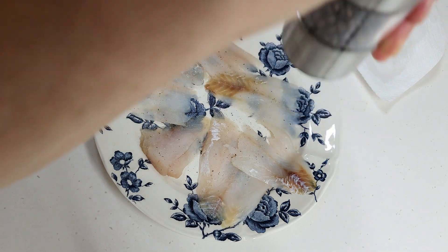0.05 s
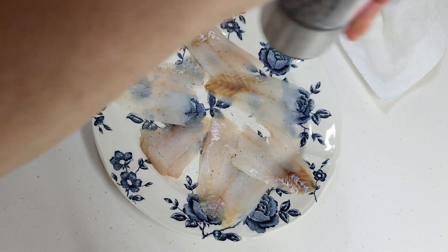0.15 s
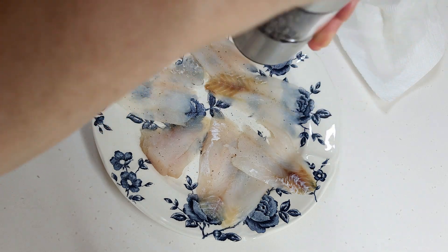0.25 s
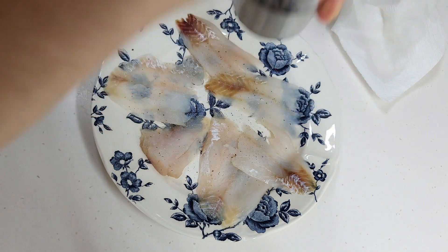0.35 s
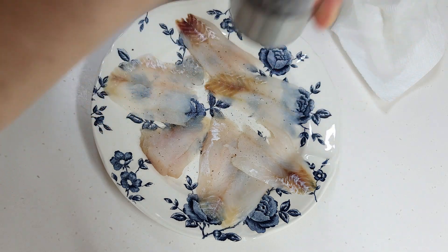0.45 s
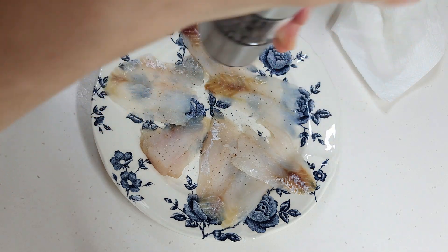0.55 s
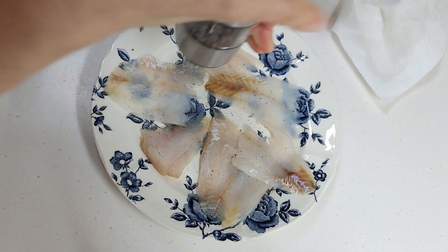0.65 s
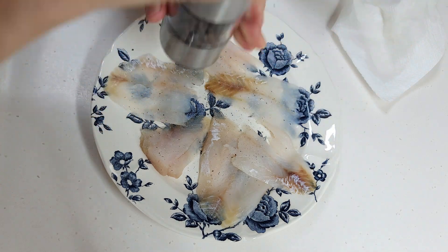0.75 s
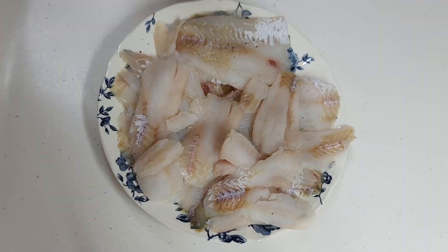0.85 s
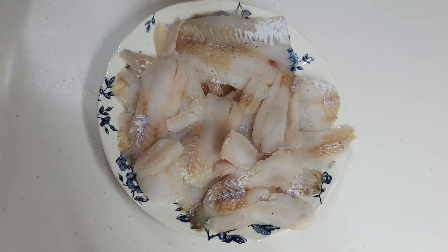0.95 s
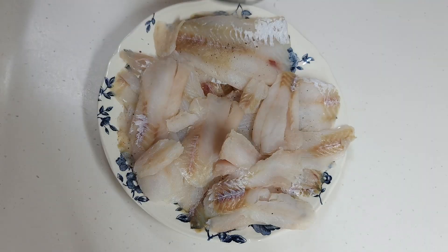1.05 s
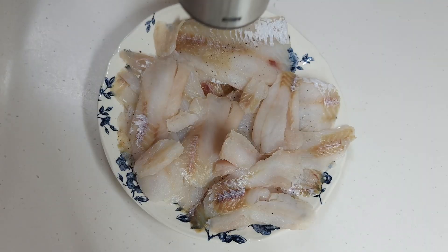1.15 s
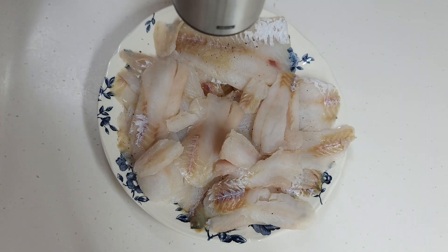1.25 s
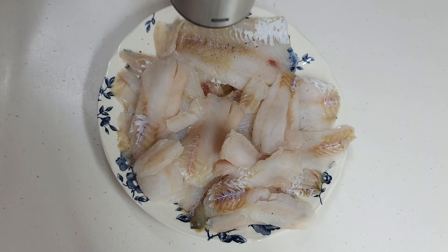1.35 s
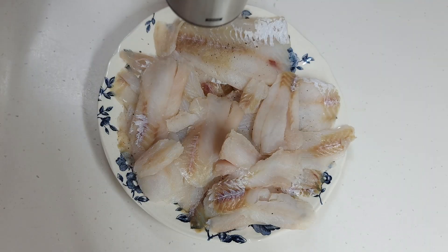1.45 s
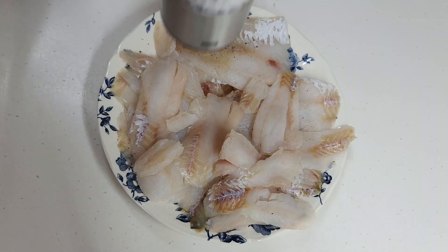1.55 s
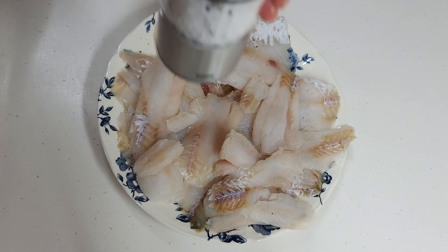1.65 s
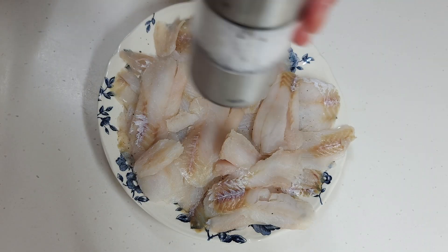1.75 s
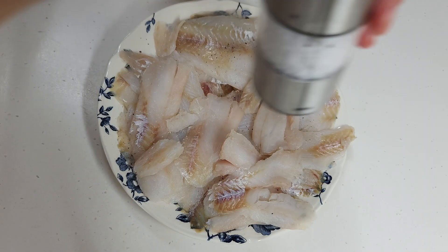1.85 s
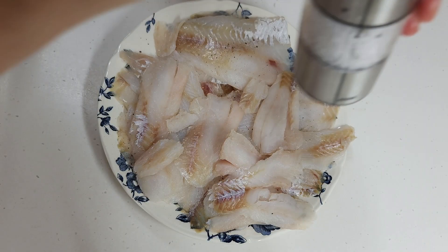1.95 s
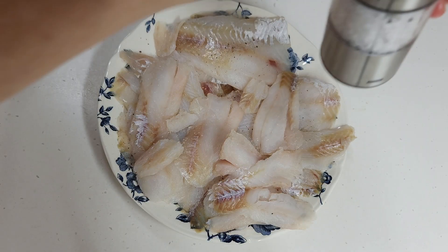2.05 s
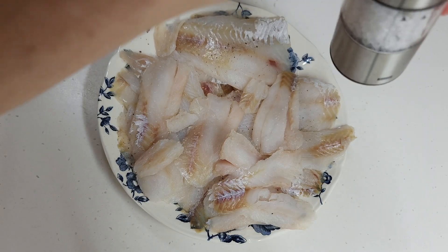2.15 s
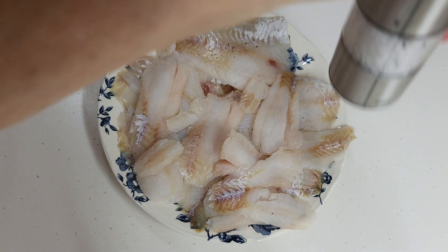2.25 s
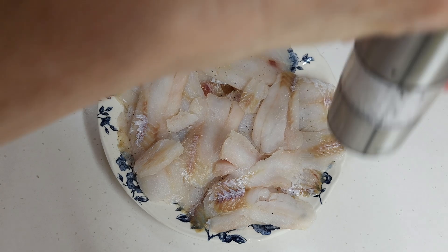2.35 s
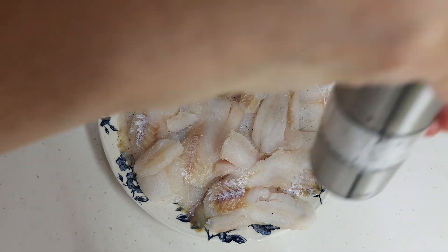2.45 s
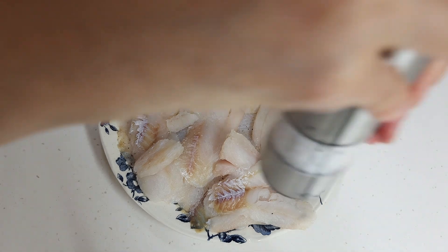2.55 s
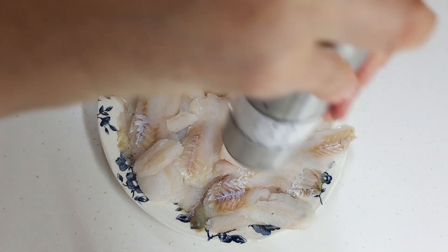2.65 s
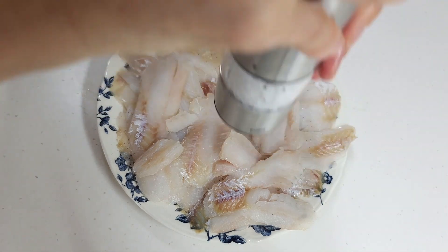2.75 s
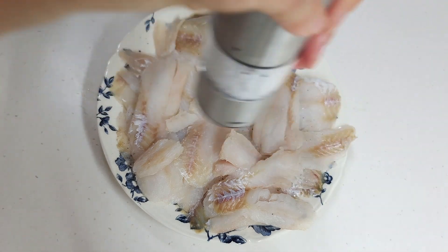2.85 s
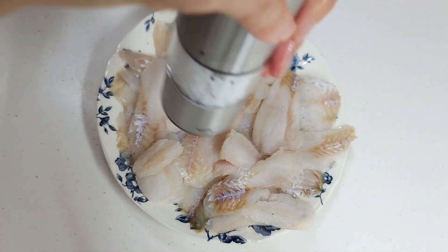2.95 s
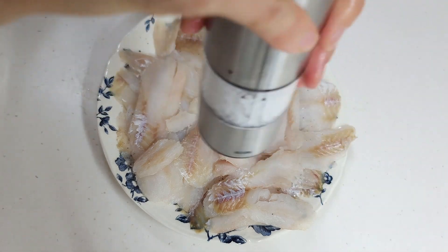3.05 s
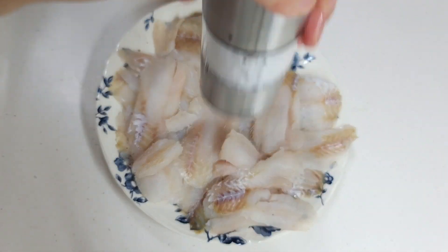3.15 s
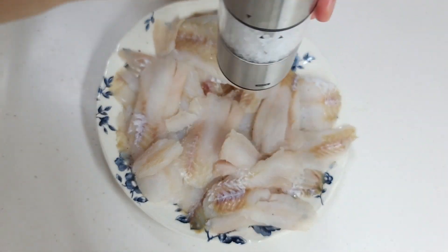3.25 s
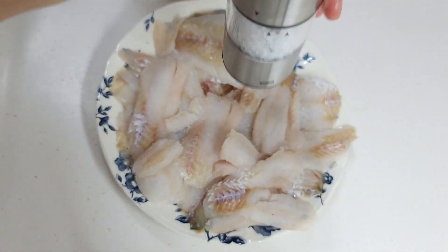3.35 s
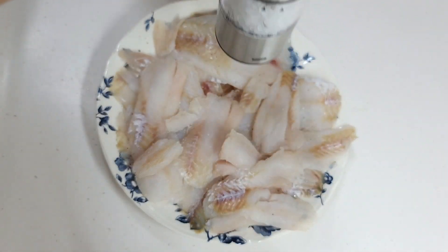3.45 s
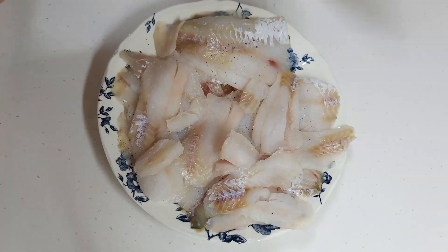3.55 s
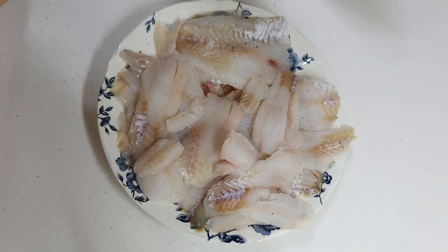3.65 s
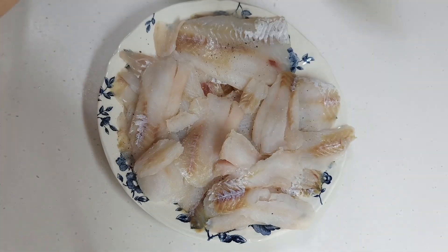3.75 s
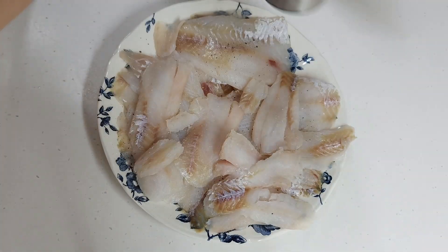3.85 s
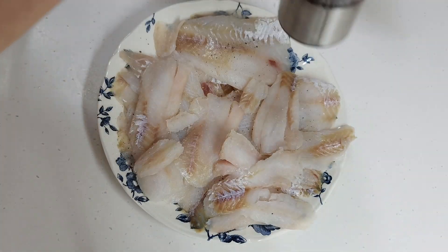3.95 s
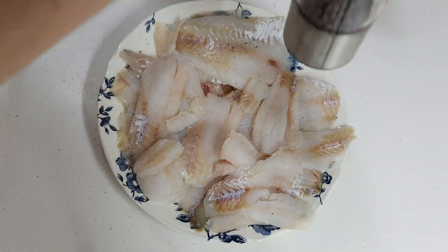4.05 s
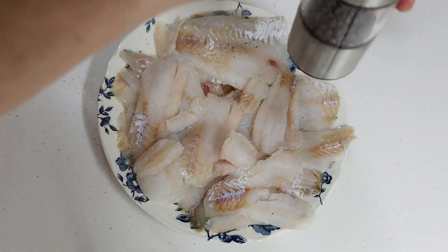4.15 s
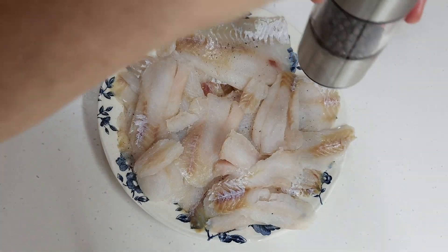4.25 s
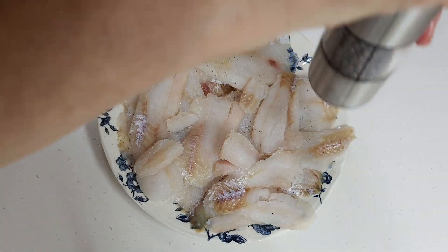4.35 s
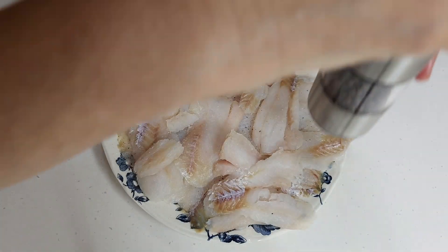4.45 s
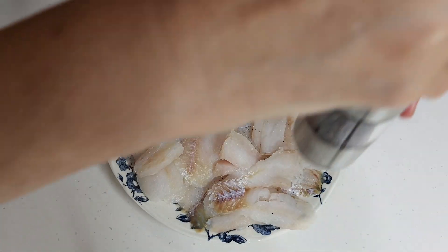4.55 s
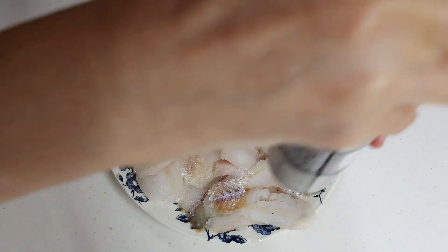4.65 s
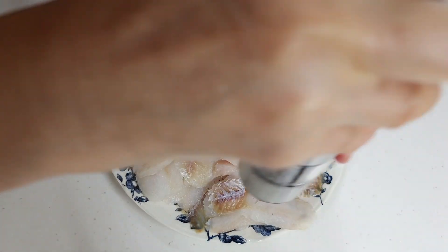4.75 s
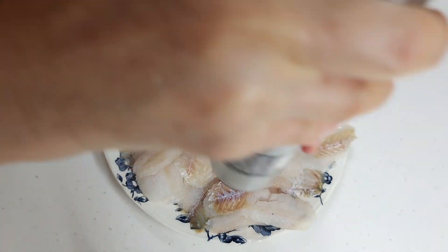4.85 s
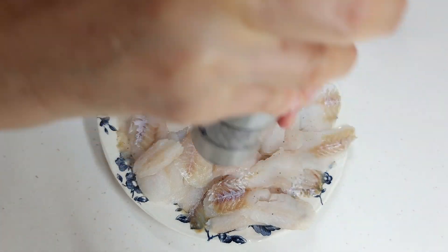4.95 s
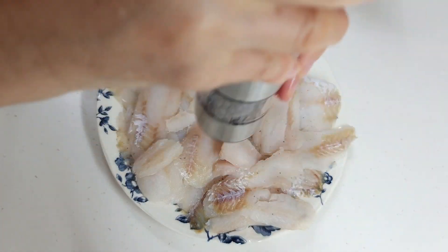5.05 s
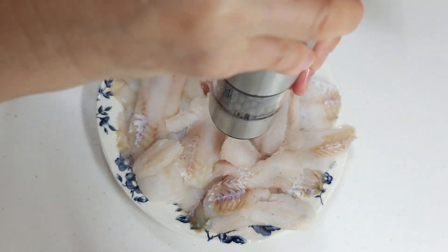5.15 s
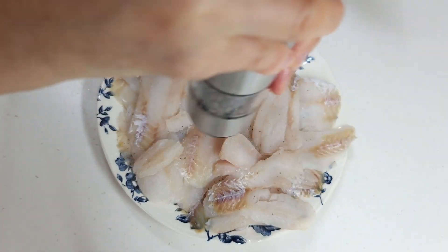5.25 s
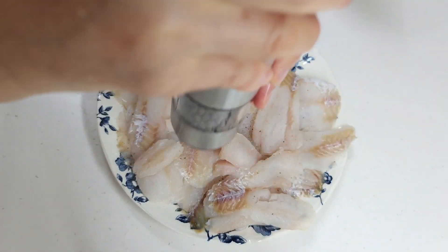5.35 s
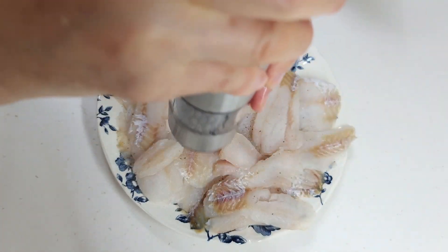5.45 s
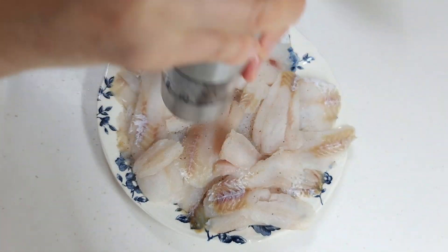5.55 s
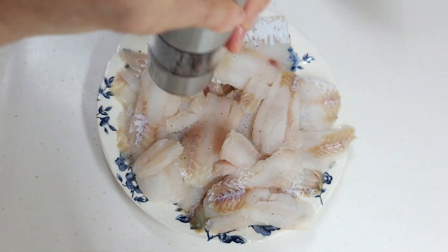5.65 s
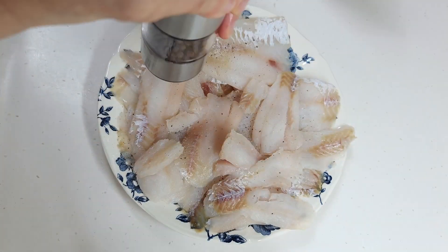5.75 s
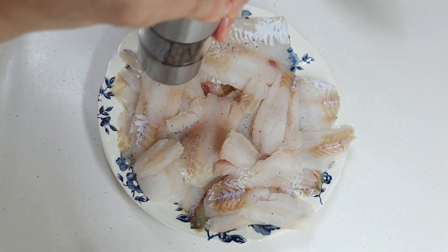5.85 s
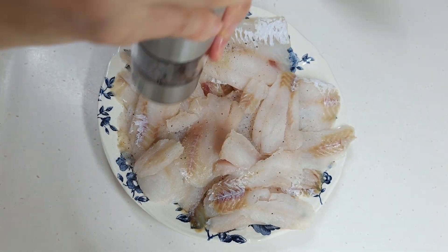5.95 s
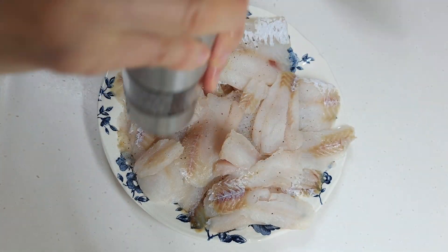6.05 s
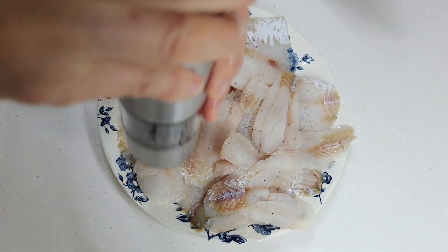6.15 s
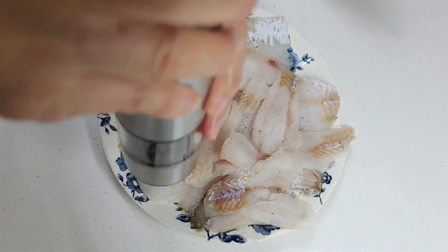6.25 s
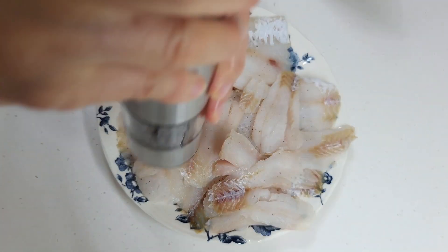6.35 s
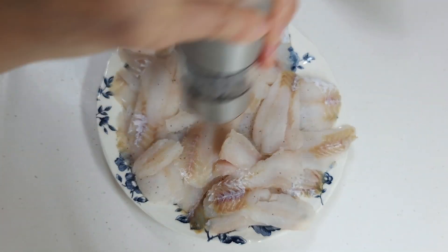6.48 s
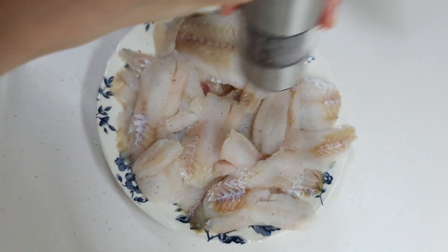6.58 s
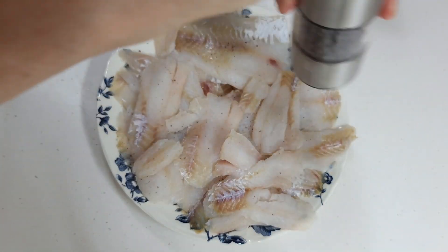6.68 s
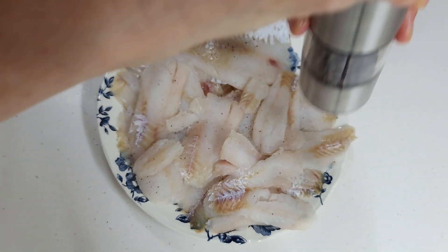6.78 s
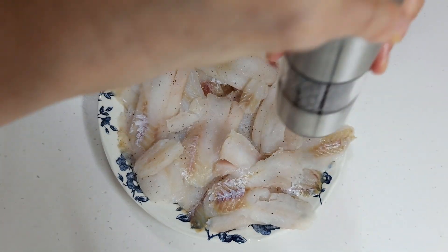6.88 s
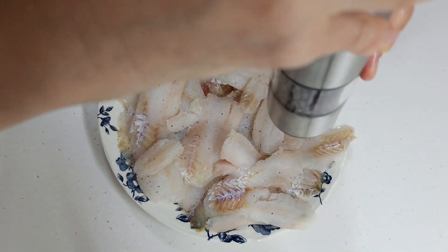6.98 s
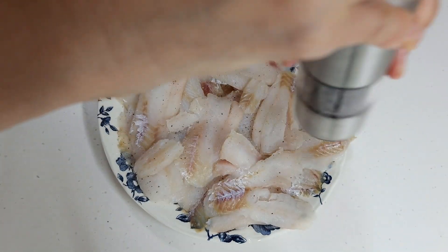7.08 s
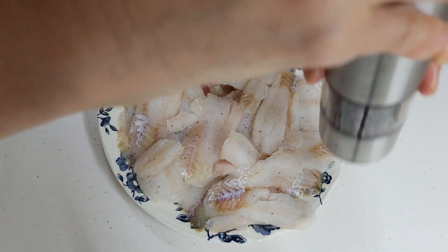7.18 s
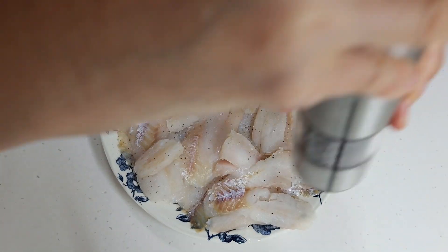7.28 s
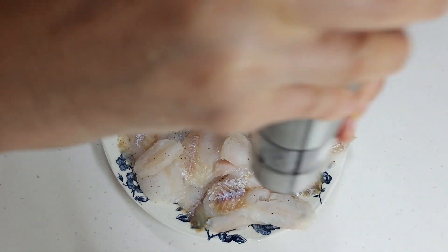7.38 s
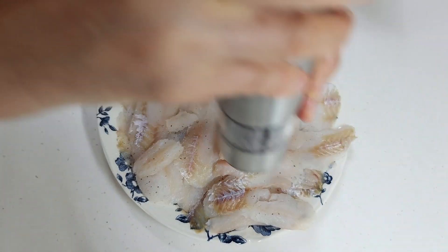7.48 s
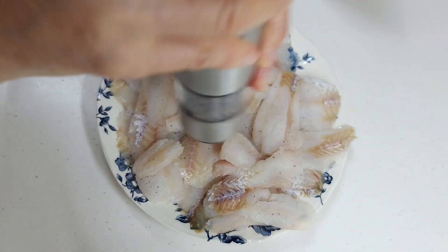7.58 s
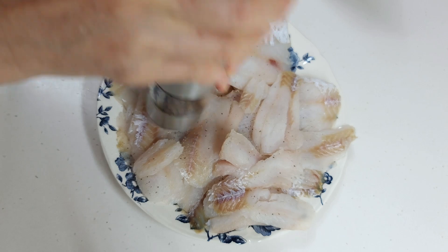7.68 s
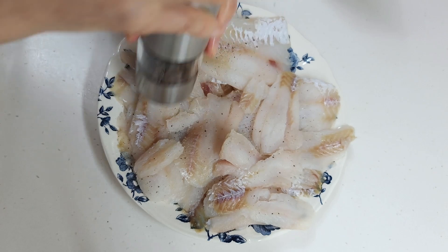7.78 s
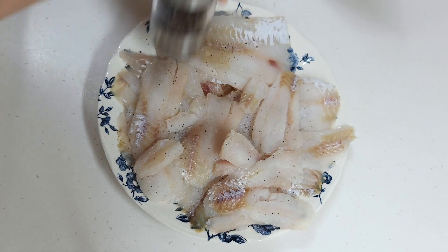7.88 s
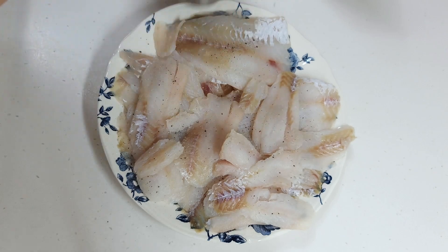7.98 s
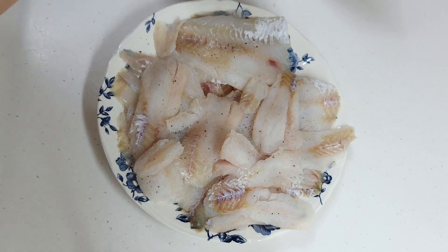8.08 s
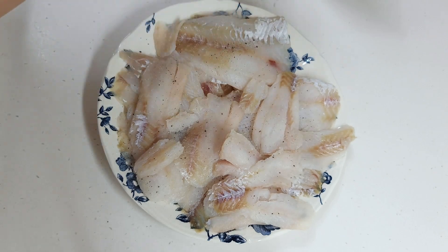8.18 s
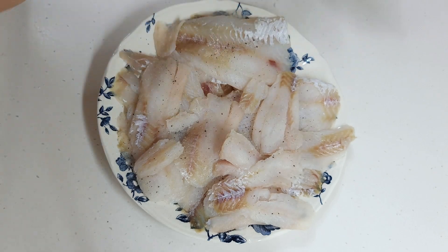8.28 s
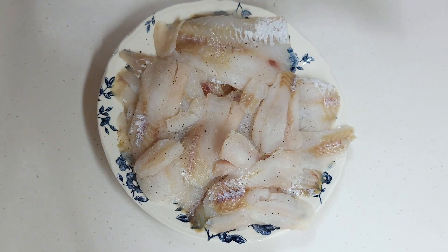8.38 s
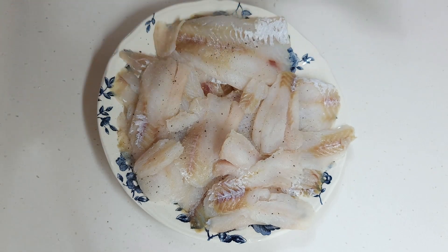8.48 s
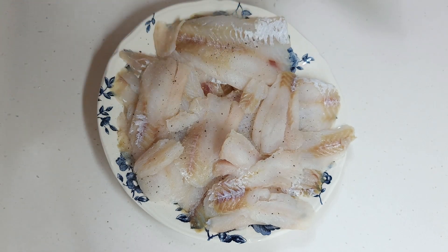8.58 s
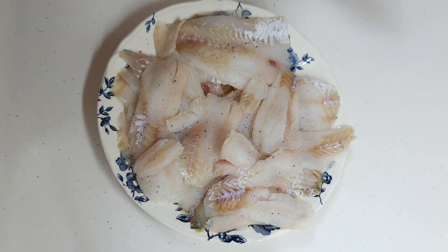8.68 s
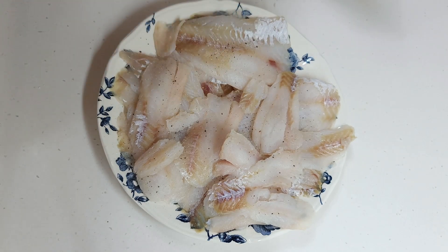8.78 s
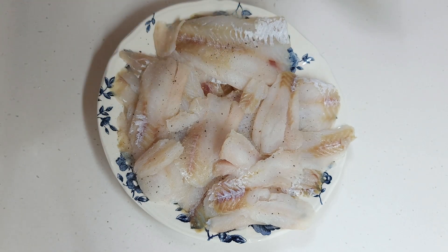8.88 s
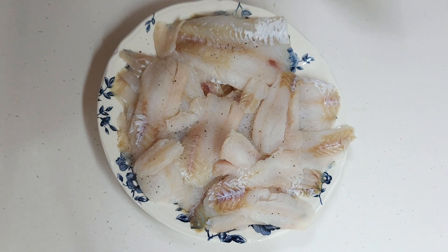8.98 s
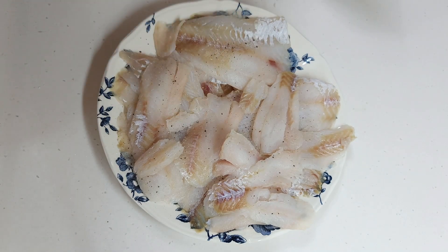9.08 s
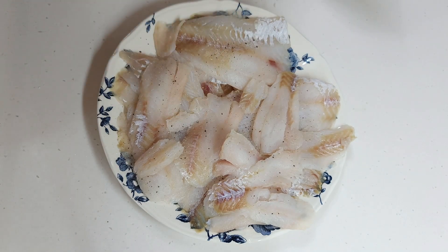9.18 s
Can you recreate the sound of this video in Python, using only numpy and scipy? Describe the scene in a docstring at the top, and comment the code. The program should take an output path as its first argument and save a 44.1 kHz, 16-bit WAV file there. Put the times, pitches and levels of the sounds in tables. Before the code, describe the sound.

Small electric grinder motors whir and whine in four spells, one crunching hard salt, then dull thuds bump the microphone stand in a quiet kitchen.

```python
"""A kitchen table, where two electric grinders season fish in four spells: pepper, salt, pepper, pepper.
Each motor drives a whining gear train that rattles in its housing and sags whenever a grain jams.
Salt crunches more, and hard grains crack: filtered noise bursts, as are the light clicks of handling.
At the end bumps on the microphone stand thud as decaying sines; low room rumble lies beneath."""
import sys
import numpy as np
from scipy import signal
from scipy.fft import rfft, irfft
from scipy.io import wavfile
from scipy.ndimage import map_coordinates

SR = 44100
rng = np.random.default_rng(int(sys.argv[2]) if len(sys.argv) > 2 else 0)


def wav_record(signal):
    """Record a signal, one row per channel, as 16-bit PCM in the file named by sys.argv[1]."""
    frames = np.transpose(np.atleast_2d(signal))
    bounded = np.clip(frames, -1, 1)
    # unit amplitude maps onto the largest positive 16-bit level
    quanta = np.round(bounded * 32767).astype(np.int16)
    wavfile.write(sys.argv[1], SR, quanta)


N = 406865
TIME = np.arange(N) / SR
TEETH = 11  # mesh cycles per turn of the shaft

# resonances of the salt grinder's housing: (frequency [Hz], width [Hz], lift [dB])
SALT_HOUSING = [(2053, 220, 7.8), (3115, 810, 9.5), (5180, 580, 10.5), (6150, 1000, 16.3), (8000, 370, 1)]


def amp(db):
    """Decibels to gain."""
    return 10 ** (np.asarray(db) / 20)


def unit(x):
    """Scales to rms 1."""
    return x / np.sqrt(np.mean(x ** 2) + 1e-20)


def read(points, hz):
    """Reads a table on a log-frequency axis."""
    f, value = np.transpose(points)
    return np.interp(np.log(hz + 1), np.log(f + 1), value)


def add(mix, s, sound):
    """Mixes a sound in at s seconds."""
    part = mix[..., max(round(s * SR), 0):][..., :sound.shape[-1]]
    part += sound[..., :part.shape[-1]]


def blend(a, b, share):
    """Mixes two signals so that b has the given share of the power."""
    share = np.clip(share, 0, 1)
    return np.sqrt(1 - share) * unit(a) + np.sqrt(share) * unit(b)


def wander(n, hz):
    """Slow chance of rms 1, with rates up to about hz."""
    rates = np.fft.rfftfreq(n, 1 / SR)
    return unit(irfft(rfft(rng.standard_normal(n)) / (1 + (rates / hz) ** 4), n))


def lifted(resonances, hz):
    """The dB that resonances add at a frequency."""
    return sum(lift / (1 + (2 * (hz - f) / width) ** 2) for f, width, lift in resonances)


def above(value, knee, steepness):
    """A gain that is 1 well above the knee and falls away below it."""
    return 1 / (1 + (knee / (value + 1)) ** steepness)


def body(x, colour, resonances=(), size=4096):
    """Rings x through a causal filter: a smooth spectrum lifted by resonances."""
    hz = abs(np.fft.fftfreq(size, 1 / SR))
    log_gain = np.log(amp(read(colour, hz) + lifted(resonances, hz)))
    # minimum phase: the ring starts at once and only decays
    ring = np.fft.ifft(np.exp(np.conj(signal.hilbert(log_gain)))).real[:size // 2]
    return signal.oaconvolve(x, ring)[:len(x)]


def band(x, lo_hz, hi_hz):
    """The part of x between two frequencies."""
    hz = np.fft.rfftfreq(len(x), 1 / SR)
    return irfft(rfft(x) * ((hz > lo_hz) & (hz < hi_hz)), len(x))


def burst(t60, colour, resonances=(), size=4096):
    """A short crackle of peak 1 that builds in a moment and dies away."""
    t = np.arange(size) / SR
    x = body(rng.standard_normal(size) * amp(-60 * t / t60), colour, resonances)
    x *= 1 - np.exp(-t / .002)
    return x / abs(x).max()


def pepper_grinder():
    """Tones and rattle of the pepper spells: softer grains, so the mill mostly whirs."""
    # presses of the button: (on [s], off [s], coasting time [s], free speed [turns/s], whine [relative dB],
    # rattle [relative dB], treble [dB re rattle], squeal [dB re rattle])
    spells = [(-0.4, 0.392, 0.18, 187.5, -29.5, -26.5, -13, -24.5),
              (3.872, 6.497, 0.29, 196.5, -33, -30.5, -10.5, -15.5),
              (6.869, 7.505, 0.278, 192.3, -32.5, -30, -12.5, -20)]
    # gear mesh and its side tone: (order [cycles/turn], level [dB re whine])
    mesh = [(11, 0), (12, -5.5)]
    # overtones of the mesh, a thin squeal: (order [cycles/turn], level [dB re squeal])
    high_mesh = [(22, 0), (23, -0.5), (24, -8), (33, -4), (34, -8)]
    # other orders of the motor: (order [cycles/turn], level [relative dB])
    orders = [(3, -31), (4, -25), (5, -30), (8, -18), (9, -20), (10, -24), (14, -24), (15, -23), (16, -22),
              (18, -21)]
    # spectrum of the rattle: (frequency [Hz], level [relative dB])
    colour = [(100, -11.5), (450, -31.5), (800, -16), (1150, -10), (1600, -3.5), (2600, -3), (3300, 0),
              (3900, -5.5), (5000, -4.5), (5600, -6), (6500, -9), (7300, -13.5), (11500, -18), (15500, -23)]
    # resonances of the housing: (frequency [Hz], width [Hz], lift [dB])
    housing = [(1455, 110, 7.5), (2050, 560, 6.9), (4356, 400, 8.7), (6070, 330, 4.6), (9130, 710, 3.9),
               (10420, 370, 5.1)]
    # panel resonances that the squeal sweeps through: (frequency [Hz], width [Hz], lift [dB])
    panel = [(4203, 410, 9.5), (6040, 300, 9)]
    out = np.zeros((2, N))
    for spell in spells:
        add(out, *grinder(spell, mesh, high_mesh, orders, colour, housing, panel,
                          repeat_share=0.27, grain_share=0.49, flutter_db=1.0, swell_db=0.53,
                          clatter_db=6.5, hum_db=-0.5, octave_db=-2, treble_follow=-0.38))
    return out


def salt_grinder():
    """Tones and rattle of the salt spell: hard grains take more of the power and crunch."""
    # presses of the button: (on [s], off [s], coasting time [s], free speed [turns/s], whine [relative dB],
    # rattle [relative dB], treble [dB re rattle], squeal [dB re rattle])
    spells = [(1.079, 3.06, 0.272, 192.1, -32.5, -20.5, -8, -17)]
    # gear mesh and its side tone: (order [cycles/turn], level [dB re whine])
    mesh = [(11, 0), (12, -14)]
    # overtones of the mesh, a thin squeal: (order [cycles/turn], level [dB re squeal])
    high_mesh = [(32, -8), (33, 0), (34, -8)]
    # other orders of the motor: (order [cycles/turn], level [relative dB])
    orders = [(1, -28), (3, -25), (4, -35), (5, -33), (8, -26), (9, -26), (10, -22), (16, -24)]
    # spectrum of the rattle: (frequency [Hz], level [relative dB])
    colour = [(100, -34.5), (400, -11), (750, -5.5), (1150, -2), (1500, 5.5), (2500, 2), (3800, 2.5),
              (4600, 5.5), (5800, -6.5), (7200, -0.5), (9500, -3), (12000, -1.5), (15500, -10)]
    # panel resonances that the squeal sweeps through: (frequency [Hz], width [Hz], lift [dB])
    panel = [(4950, 300, 15.4), (6240, 180, 10.6)]
    out = np.zeros((2, N))
    for spell in spells:
        add(out, *grinder(spell, mesh, high_mesh, orders, colour, SALT_HOUSING, panel,
                          repeat_share=0.2, grain_share=0.64, flutter_db=2.5, swell_db=0.45,
                          clatter_db=4.5, hum_db=-0.6, octave_db=-3.5, treble_follow=0.36))
    return out


def grinder(spell, mesh, high_mesh, orders, colour, housing, panel, repeat_share, grain_share,
            flutter_db, swell_db, clatter_db, hum_db, octave_db, treble_follow):
    """One spell: its start, then tones and rattle that share one shaft angle and fade as the shaft stops."""
    on, off, coast_s, free_speed, whine_db, rattle_db, treble_db, squeal_db = spell
    whine_low_hz, whine_steepness = 1370, 16  # below this pitch the housing radiates little whine
    rattle_low_speed, rattle_steepness = 74.4, 3.46  # turns/s below which the rattle dies away
    engage_s = 0.0083  # the slack in the gears is taken up before they rattle in full
    t = np.arange(max(on, 0), off + coast_s, 1 / SR)
    n = len(t)
    speed, whine_lift_db, rattle_lift_db, squeal_lift_db = motor(t, on, off, coast_s, free_speed)
    pace = speed / free_speed
    turns = np.cumsum(speed * (1 + 0.0012 * wander(n, 81))) / SR  # slight random jitter

    whine_gain = amp(whine_db + whine_lift_db) * above(TEETH * speed, whine_low_hz, whine_steepness)
    rattle_gain = amp(rattle_db + rattle_lift_db + swell_db * wander(n, 15))
    rattle_gain *= above(speed, rattle_low_speed, rattle_steepness)
    rattle_gain *= 1 - np.exp(-(t - on) / engage_s)
    treble_gain = amp(treble_db + treble_follow * rattle_lift_db)

    rattle = gear_rattle(turns, pace, treble_gain, colour, housing, repeat_share, grain_share,
                         flutter_db, clatter_db)
    whine, hum, squeal = shaft_tones(turns, speed, pace, squeal_db + squeal_lift_db, mesh, high_mesh,
                                     orders, panel, hum_db, octave_db)
    tones = whine_gain * whine + rattle_gain * (hum + squeal)
    return t[0], np.array([tones, amp(-1.5) * rattle_gain * rattle]) * signal.windows.tukey(n, .01)


def motor(t, on, off, coast_s, free_speed):
    """Spin-up, sags at jams and coasting: speed in turns/s, and the lifts of whine, rattle and squeal in dB."""
    # a grain jams in the burr, presses the teeth together and drags the motor down: (deepest sag [s],
    # half length [s], sag [turns/s], whine lift [dB], rattle lift [dB], squeal lift [dB])
    jams = [(0.208, 0.0374, 1.06, 6.5, 0, 2), (0.369, 0.059, 15.7, 3.5, 0, 0),
            (1.197, 0.041, 18.6, 11.5, 4.5, 7), (1.296, 0.064, 27, 10.5, 3.5, -4),
            (1.474, 0.039, 5, 10.5, 0, -7), (1.614, 0.026, 5.24, 10.5, 2, 2),
            (1.719, 0.031, 11.8, 12, 1.5, 16), (1.783, 0.024, 12, 12, 3, 13), (1.893, 0.05, 11, 11, 1.5, 1),
            (2.164, 0.043, 6.2, 6, -0.5, 5), (2.332, 0.058, 5.3, 8, 2, 1),
            (2.557, 0.038, 10.1, 15, 2.5, 11), (2.736, 0.04496, 10.3, 15, 1, 4),
            (2.839, 0.051, 7, 7, 1.5, -3), (3.046, 0.023, 2.7, 8, 3, 1), (4.201, 0.1, 20.3, 12.5, 2, 8),
            (4.458, 0.092, 18.1, 7, 3, 12.5), (4.611, 0.067, 17.1, 8, 2, 6.5),
            (5.076, 0.15, 7.04, -1, 0.5, 2), (5.418, 0.062, 13, 2, 3, 8), (5.717, 0.148, 14.3, 3.5, 2.5, 4),
            (5.951, 0.074, 5.95, -6, 1.5, 2), (6.13, 0.074, 10.8, 0, 2, 0), (6.319, 0.038, 5.65, 7, 3, -23),
            (7.02, 0.075, 13.6, 5.5, 4, 0), (7.091, 0.0279, 3.01, 8, 0.5, 0),
            (7.192, 0.03, 5.54, 11, 4.5, 6), (7.321, 0.066, 15.4, 13, 4.5, 2),
            (7.419, 0.026, 4.6, 13.5, 4.5, -5)]
    spin_up_s = 0.055  # time constant
    coast_curve = 1.2  # friction stops the motor almost linearly
    load_lead, load_length = 0.49, 0.89  # shares of the half length: load peaks before the sag, and is briefer
    coast_whine_db, release_s = 9, 0.086  # once the drive lets go, the mesh rings more freely

    at, half_s, sag, whine_lift_db, rattle_lift_db, squeal_lift_db = np.transpose(jams)
    through = (t[:, None] - at) / half_s
    drag = np.exp(-through ** 2)
    load = np.exp(-((through + load_lead) / load_length) ** 2)
    driven = free_speed * (1 - np.exp(-(t - on) / spin_up_s)) - drag @ sag
    coasting = np.clip(1 - (t - off) / coast_s, 0, 1) ** coast_curve
    speed = np.maximum(driven, 0) * coasting
    released = np.clip((t - off) / release_s, 0, 1)
    whine_lift = load @ whine_lift_db + coast_whine_db * released
    return speed, whine_lift, load @ rattle_lift_db, load @ squeal_lift_db


def shaft_tones(turns, speed, pace, squeal_db, mesh, high_mesh, orders, panel, hum_db, octave_db):
    """Whine, hum and squeal: partials locked to multiples of the shaft's turning."""
    n = len(turns)
    angle = 2 * np.pi * turns

    def line(order):
        """A partial of the shaft, wavering at random in phase and level."""
        phase = 2 * np.pi * rng.random() + .18 * wander(n, 40)
        return unit(np.cos(order * angle + phase) * amp(3.5 * wander(n, 25)))

    whine = sum(amp(db) * line(order) for order, db in mesh)
    # the low orders come from unbalance, which grows with speed squared
    hum = amp(hum_db) * sum(amp(db) * line(order) * (pace ** 2 if order < 7 else pace)
                            for order, db in orders)
    # near half speed the mesh's octave swells as it sweeps through a resonance at 1850 Hz
    octave = 2 * TEETH
    hum += amp(octave_db) * line(octave) / (1 + ((octave * speed - 1850) / 350) ** 2)
    squeal = sum(amp(squeal_db + db + lifted(panel, order * speed)) * line(order)
                 for order, db in high_mesh)
    return whine, hum, squeal


def gear_rattle(turns, pace, treble_gain, colour, housing, repeat_share, grain_share,
                flutter_db, clatter_db):
    """Worn and loose teeth and snapping grains strike the housing, which rings."""
    n, size = len(turns), 160  # size: points of roughness around the wheel
    angle = 2 * np.pi * turns
    # worn teeth repeat one rough pattern every turn
    worn = map_coordinates(rng.standard_normal(size), [turns % 1 * size], order=3, mode="grid-wrap")
    # loose ones chatter at random as they meet
    chatter = rng.standard_normal(n) * (1 + 0.7 * np.cos(angle)) * (1 + .5 * np.cos(TEETH * angle))
    # grains snap at random in the burr, 1500 a second on average
    grain_db = 3.5 * np.minimum(rng.exponential(1, n), 3)
    grains = (rng.random(n) < 1500 / SR) * rng.choice([-1, 1], n) * amp(grain_db)

    drive = blend(blend(chatter, worn, repeat_share), grains, grain_share)
    rattle = body(drive * amp(flutter_db * wander(n, 55)), colour, housing)
    rattle /= band(rattle, 2600, 7500).std()
    # slow gears clatter lower
    clatter = band(rattle, 1100, 2600)
    # hard-breaking grains fizz above the housing's main resonances
    fizz = band(rattle, 7500, SR / 2)
    rattle += clatter * (amp(clatter_db * (1 - pace)) - 1)
    rattle += fizz * (treble_gain / fizz.std() - 1)
    return rattle


def cracks():
    """Hard grains crack in the burr: a bright snap in the housing and a knock on the mill's body."""
    # (time [s], snap [relative dB], knock [relative dB])
    hard_grains = [(0.4372, -29, -35.5), (1.1274, 3, -25), (1.2327, -6, -37), (1.282, -5, -50),
                   (1.5744, -17, -34.5), (1.7092, 4, -42), (1.7803, -10.5, -34), (1.8675, 4.5, -34),
                   (2.0243, 2, -33), (2.4523, 2, -48), (2.959, -10, -30.5), (7.2027, -16, -32.5)]
    snap_colour = [(400, -13), (1500, 0.5), (5000, -6), (15000, -8.5)]  # (frequency [Hz], level [dB])
    knock_colour = [(150, -13.5), (400, -6), (1000, 1.5), (1600, -4.5), (3000, -23.5)]
    out = np.zeros(N)
    for s, snap_db, knock_db in hard_grains:
        add(out, s, amp(snap_db - 5.0) * burst(t60=0.022, colour=snap_colour, resonances=SALT_HOUSING))
        add(out, s, amp(knock_db + 12) * burst(t60=0.012, colour=knock_colour))
    return out


def clicks():
    """Small hard things touch, each with its own ring."""
    # buttons, grains and handling: (time [s], level [relative dB], centre [Hz])
    touches = [(0.543, -25, 5100), (0.5637, -27.5, 6440), (0.5814, -36, 4900), (0.7094, -43, 4180),
               (3.2393, -47, 5030), (3.479, -42.5, 4860), (3.8162, -41, 3410), (3.8437, -40, 3500),
               (3.879, -37, 2400), (3.9517, -21, 4570), (7.712, -34.5, 4200), (8.149, -37.5, 6300),
               (8.174, -33.5, 7450), (8.1894, -42, 6720), (8.221, -42, 13290), (8.287, -41.5, 5470)]
    colour = [(500, -17), (3000, 2.5), (7000, 1.0), (15000, -7.0)]  # (frequency [Hz], level [dB])
    out = np.zeros(N)
    for s, db, hz in touches:
        add(out, s, amp(db + 5.0) * burst(t60=0.013, colour=colour, resonances=[(hz, 1500, 7)]))
    return out


def bumps():
    """Each bump sets the stand thudding in its low modes and ticks at each microphone."""
    # (time [s], thud [relative dB], tick [dB])
    knocks = [(8.549, -3.5, -23.5), (8.597, -25, -26), (8.618, -24, -31), (8.661, -25.5, -39),
              (8.708, -25, -27.5), (8.814, -26.5, -43), (9, -20.5, -43), (9.074, -22.5, -39)]
    # modes of the stand: (frequency [Hz], level [relative dB], t60 [s])
    modes = [(65.3, -15.5, 0.58), (119, 10.5, 0.048), (157.6, -7.5, 0.18), (226, -4, 0.078),
             (404, -24, 0.13)]
    # spectrum of the tick: (frequency [Hz], level [relative dB])
    tick_colour = [(200, 15.5), (600, 8), (1300, 4.5), (2200, 2.5), (5000, -1.5), (8000, -13.5),
                   (15000, -23)]
    out = np.zeros((2, N))
    t = np.arange(SR // 2) / SR
    thud = sum(amp(db - 60 * t / t60) * -np.sin(2 * np.pi * hz * t) for hz, db, t60 in modes)
    thud *= 1 - np.exp(-(t / 0.0034) ** 2)  # a soft push takes a few milliseconds to build
    thud /= abs(thud).max()
    for s, thud_db, tick_db in knocks:
        add(out, s, amp(thud_db - 4.5) * thud)
        for channel in out:
            add(channel, s, amp(tick_db) * burst(t60=0.11, colour=tick_colour))
    return out


def microphones(x):
    """The nearer microphone hears the moving grinder a little earlier and louder."""
    # where the grinder is held: (time [s], lead of the left microphone [ms])
    side = [(0.2, -0.061), (0.45, 0.054), (1.2, 0.15), (1.72, 0.091), (2.05, -0.12), (2.5, -0.11),
            (3.05, 0.11), (4.3, -0.13), (5, 0.047), (6.25, 0.18), (6.5, 0.3), (6.95, 0.029), (7.28, 0.013),
            (7.48, 0.27)]
    lead_ms = np.interp(TIME, *np.transpose(side))
    half_lead = lead_ms * SR / 2000  # samples, earlier on one side and later on the other
    places = [TIME * SR + half_lead, TIME * SR - half_lead]
    balance_db = 4 * lead_ms - .7
    return np.array([map_coordinates(x, [p], order=3) for p in places]) * amp([balance_db, -balance_db])


def kitchen(x, early_db=4, early_t60=0.039, count=4):
    """Early reflections off table and plate, then a short tail; their pattern cycles twice a second."""
    # decay of the tail: (frequency [Hz], t60 [s])
    decay = [(200, 0.18), (2000, 0.28), (6000, 0.32), (15000, 0.027)]
    out = np.zeros((2, N))
    for k in range(count):
        # sparse random echoes, 4000 a second on average
        taps = rng.choice([-1., 1.], (2, SR // 2)) * (rng.random((2, SR // 2)) < 4000 / SR)
        taps[:, :SR // 700] = 0  # no echo before 1.4 ms
        hz, t, z = signal.stft(taps, SR, nperseg=256)
        fade = amp(-60 * t / read(decay, hz)[:, None]) + amp(early_db - 60 * t / early_t60)
        tail = signal.istft(z * fade, SR, nperseg=256)[1]
        tail /= np.linalg.norm(tail, axis=1, keepdims=True)
        # each pattern takes its turn, as if the hands moved
        turn = np.maximum(np.cos(2 * np.pi * (2 * TIME + k / count)), 0)
        out += signal.fftconvolve((x * turn)[None], tail, axes=1)[:, :N]
    return out


def air():
    """Low room rumble, most alike in both microphones at the bottom, with spells of faint diffuse hiss."""
    # spectrum of the rumble: (frequency [Hz], level [relative dB])
    rumble_colour = [(20, -20.5), (50, -1), (80, -5.5), (115, -3.5), (160, -7.5), (200, -16.5),
                     (240, -17.5), (300, -17.5), (500, -20), (1000, -24.5), (2600, -35.5), (4000, -35.5),
                     (6000, -42), (16000, -57.5)]
    # (frequency [Hz], left-right likeness [correlation])
    likeness = [(60, 1), (150, 0.9), (300, 0.59), (700, 0.14), (2000, 0.16), (10000, 0.063)]
    # a faint high hiss lingers after the first two spells: (start [s], length [s], level [dB])
    hiss_spells = [(0.574, 0.264, -52.5), (0.86, 0.13, -62.5), (3.266, 0.19, -59.5)]
    hiss_colour = [(1500, -27.0), (4500, 2.5), (6800, -1), (11000, -17), (15000, -17.5)]
    hz = np.fft.rfftfreq(N, 1 / SR)
    a, b = rfft(rng.standard_normal((2, N)))
    same = np.clip(read(likeness, hz), -1, 1)
    pair = np.array([a, same * a + np.sqrt(1 - same ** 2) * b])
    rumble = irfft(pair * amp(read(rumble_colour, hz)), N)
    hiss = np.array([unit(body(noise, hiss_colour)) for noise in rng.standard_normal((2, N))])
    level = np.zeros(N)
    for s, length, db in hiss_spells:
        add(level, s, amp(db) * signal.windows.tukey(round(length * SR), .2))
    return amp(-43.5) * unit(rumble) + hiss * level


def scene():
    """Grinders, clicks and bumps in a small kitchen; the bumps reach the microphones through their stand."""
    tones, rattle = pepper_grinder() + salt_grinder()
    rattle += cracks()
    taps = clicks()
    direct = microphones(amp(-3.0) * tones + amp(-6.0) * rattle + amp(-3.5) * taps)
    room = kitchen(amp(-11) * tones + amp(-4) * (rattle + taps))
    return direct + room + bumps() + air()


def record(dry):
    """The recorder's band limit: a steep low-pass at 16 kHz."""
    low_pass = signal.firwin(511, 16000, window=("kaiser", 9), fs=SR)
    return signal.oaconvolve(dry, low_pass[None], "same")


dry = scene()
out = record(dry)
wav_record(out)
```